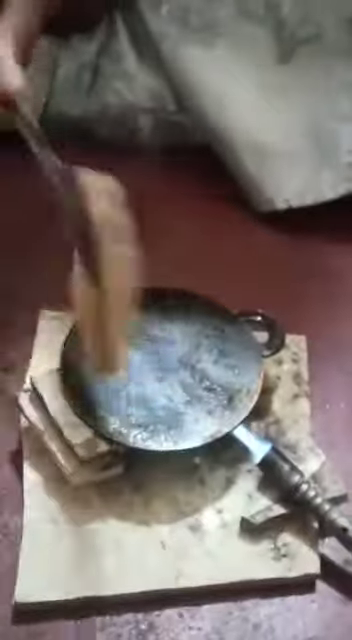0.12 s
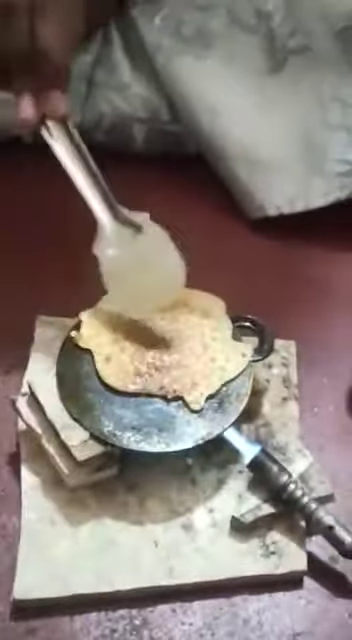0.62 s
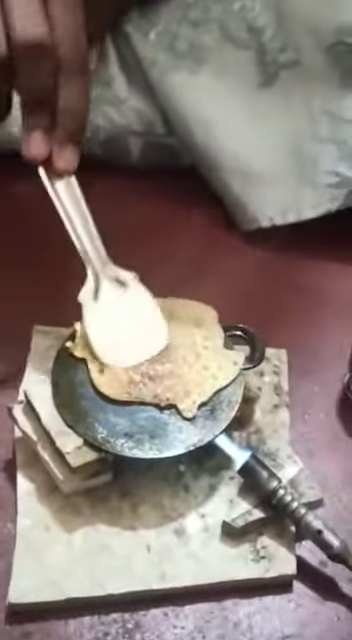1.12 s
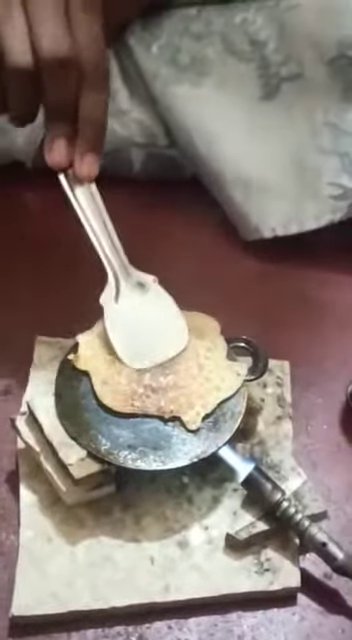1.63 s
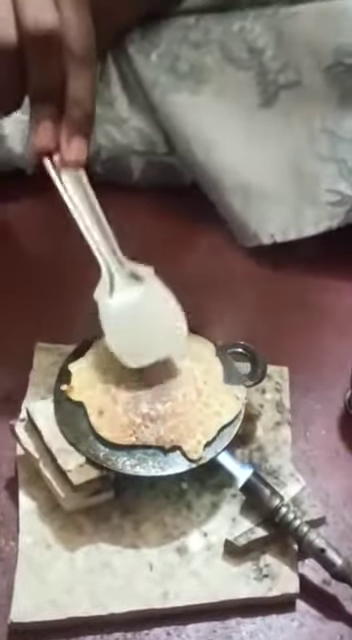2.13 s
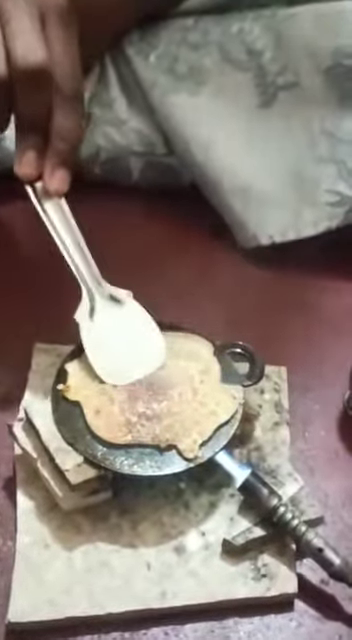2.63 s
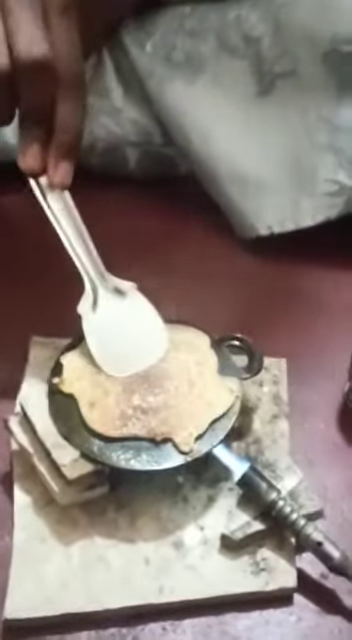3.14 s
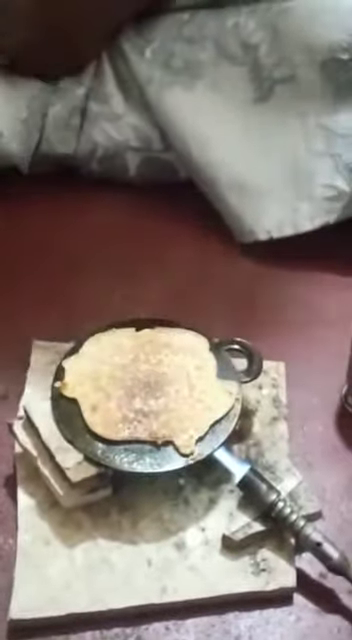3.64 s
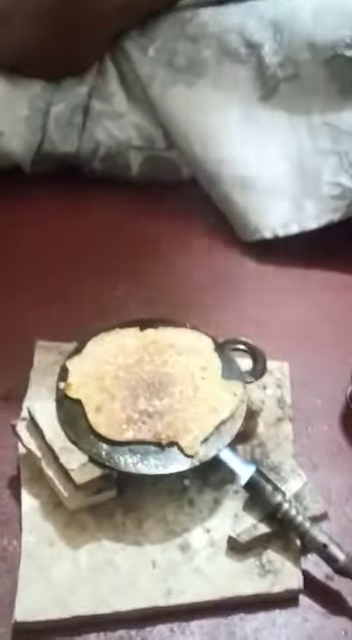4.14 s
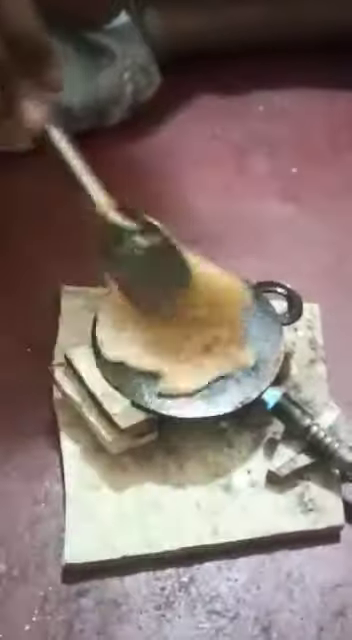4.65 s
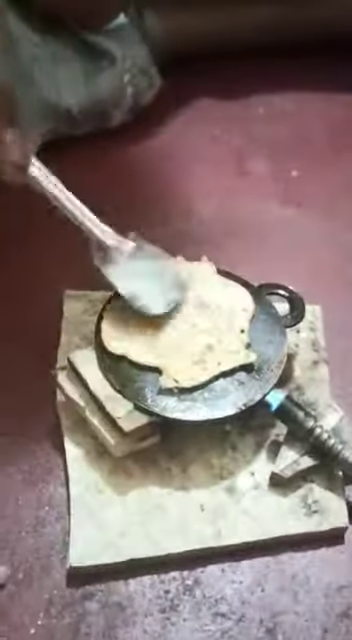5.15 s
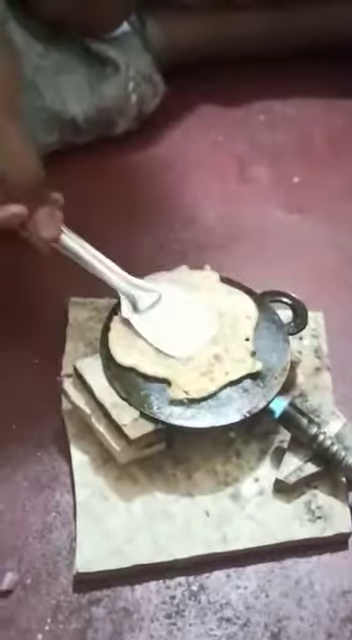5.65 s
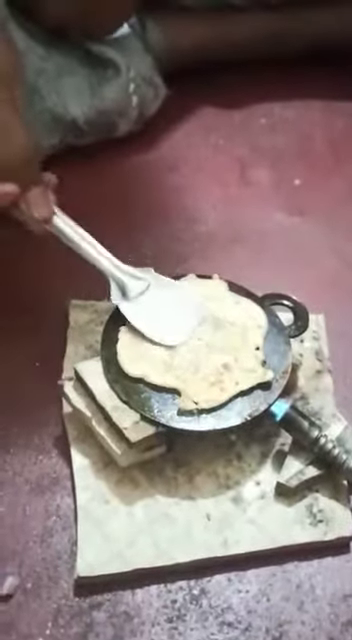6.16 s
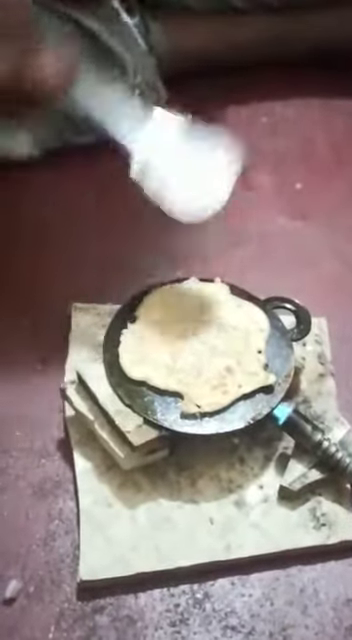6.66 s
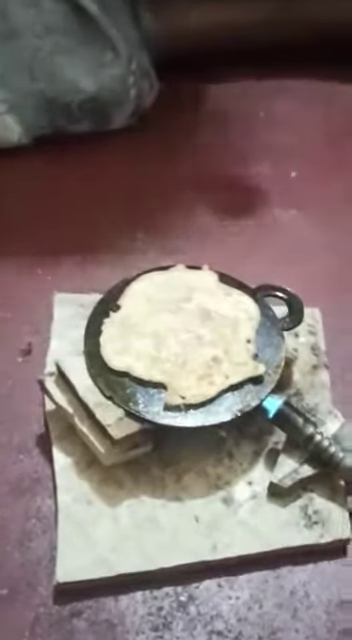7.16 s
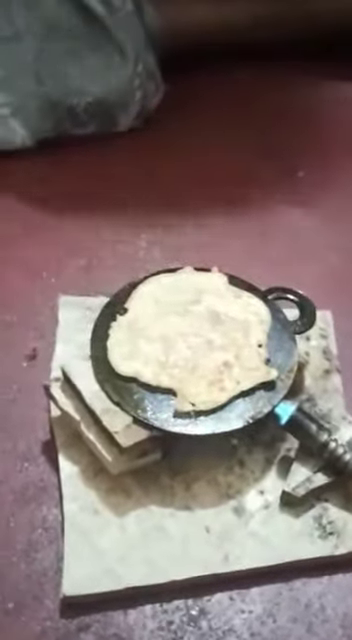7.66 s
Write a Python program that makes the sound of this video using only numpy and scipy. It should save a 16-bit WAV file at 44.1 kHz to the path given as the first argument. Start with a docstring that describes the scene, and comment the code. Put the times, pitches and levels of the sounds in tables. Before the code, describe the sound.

A flatbread slaps onto a hot iron griddle and sizzles loudly over a roaring gas torch, then resumes quieter and drier after a brief dropout.

```python
"""A small hard room: a flatbread lands on a hot iron griddle and sizzles over a roaring gas torch.
Sizzle and steam are shaped noise, swelling mostly under a pressing spatula; fat pops are short cracks
with dying spatter; bread and spatula pat the iron. The torch is roar, drone and nozzle hiss, with mains hum.
The sound drops out once, and resumes on a drier, quieter side of the bread."""
import sys
import numpy as np
from scipy import signal
from scipy.fft import rfft, irfft, next_fast_len
from scipy.io import wavfile
from scipy.ndimage import uniform_filter1d, map_coordinates

SR = 44100
rng = np.random.default_rng(int(sys.argv[2]) if len(sys.argv) > 2 else 0)


def invert_db(x):
    """Field ratio 10**(x/20) for x, a level in decibels (scalar or array-like)."""
    u = np.asarray(x, float) / 20
    return 10 ** u


def persist_wave(psi):
    """Save psi, clipped to +-1, as 16-bit WAV."""
    counts = np.round(np.clip(psi, -1, 1) * 32767).astype(np.int16)
    wavfile.write(sys.argv[1], SR, np.atleast_2d(counts).T)


N = 343690

# Broad flame noise. Each row: frequency in Hz, relative level per Hz in dB.
ROAR_HZ_DB = [(15, -63), (25, -42), (70, -17), (90, -10.5), (134, -11), (173, -10.5), (253, -11),
              (332, -11.5), (460, -15.5), (1500, -31), (1950, -75), (3300, -120)]
# Left-right likeness of the flame noise. Each row: frequency in Hz, correlation from -1 to 1.
ROAR_ALIKE = [(60, 0.28), (130, 0.73), (290, 0.45), (640, 0.44), (1410, -0.6), (3100, 0.19), (6820, -0.1),
              (15000, 0.059)]
# Room resonances that the flame excites. Each row: centre in Hz, width in Hz, rms level in dB.
DRONES = [(136.6, 12, -67.5), (169, 20.4, -53.5), (190.1, 22, -57), (228.3, 23, -63), (343, 8.1, -66)]
# Mains hum. Each row: frequency in Hz, middle rms level in dB.
HUM_HZ_DB = [(49, -79.5), (99.7, -62.5)]
# Gas nozzle hiss. Each row: frequency in Hz, relative level per Hz in dB.
JET_HZ_DB = [(700, -25.5), (1500, -30.5), (4350, -22.5), (4520, -9.5), (4650, 0.5), (4820, -14.5),
             (6000, -23.5), (7000, -6), (8000, -25), (16000, -15.5)]
# Room decay. Each row: frequency in Hz, T60 in seconds.
ROOM_HZ_T60_S = [(300, 0.54), (3000, 0.42), (14000, 0.26)]
# Griddle modes under the bread. Each row: centre in Hz, width in Hz, gain in dB.
IRON_MODES = [(398, 46, 5), (950, 220, 0.5), (1457, 120, 5), (2210, 600, -1)]
# Soft contacts of bread and spatula on the iron. Each row: start in seconds, strength in dB,
# contact time in seconds.
PATS = [(0.191, -22, 0.0014), (2.75, -37, 0.00028), (4.724, -47.5, 0.0002), (6.451, -45, 0.00016)]
# The loudest bursting drops. Each row: start in seconds, strength in dB, brightness in dB.
POPS = [(0.1925, -12, -6), (0.261, -30, 11), (0.3019, -16, -4), (0.4119, -20.5, -0.5), (0.5549, -23, 4.0),
        (0.649, -24, 5), (0.743, -24.5, -4.5), (0.8335, -17, -9), (0.9108, -21, -6), (0.9277, -27.5, 2),
        (1.0037, -21, 7), (1.0226, -12, -7), (1.222, -21, -4), (1.4298, -27, 1), (1.4642, -33, 7),
        (1.4727, -37, 5), (1.5141, -28, 0), (1.6406, -26.0, 3.5), (1.7069, -21, 0), (1.795, -20.0, 2),
        (1.8577, -43, 16), (2.031, -38, -2.0), (2.049, -26, -1), (2.069, -41, 8), (2.2238, -21.5, -4),
        (2.494, -24, -1), (2.549, -16.5, -6), (2.7426, -31, -1), (2.784, -32.5, 5), (2.8421, -25.5, 0.5),
        (3.1034, -26, 3.5), (3.421, -44, 6.0), (3.476, -30, 4.5), (3.494, -24, -6), (3.532, -35.0, 8.5),
        (3.5848, -32.5, 0), (3.6282, -32.5, 4), (3.695, -28, -1), (3.7105, -21.5, -7), (3.9346, -36.5, 6),
        (4.3946, -42, -2), (4.605, -35, -11), (4.7256, -29.5, -11), (4.7763, -34, -8.5), (4.9384, -41, 1),
        (4.9437, -38, 1.5), (5.1944, -47, -7), (5.2392, -38.5, 0.5), (5.3452, -46.5, 6), (5.362, -44.5, 3),
        (5.469, -39, -15.0), (5.5003, -42, 7), (5.5254, -49.5, 12), (5.5844, -31, 3), (5.6005, -42, -7.0),
        (5.6034, -30, -2), (5.8735, -36, -2), (5.8778, -38, -1.0), (5.921, -35, -5.0), (5.935, -33.5, 10),
        (5.946, -33, 2), (5.9668, -31, 8), (5.9816, -47, 9), (5.9967, -38, 13), (6.003, -45, 19),
        (6.0288, -35.5, 11), (6.0369, -52, 6.0), (6.068, -39, 8.0), (6.0882, -27, -8.0), (6.1137, -36, 4.5),
        (6.1583, -36.0, 8), (6.1698, -32, 3), (6.186, -44, 11), (6.208, -36, 6), (6.2328, -29.5, 7),
        (6.2444, -49, 8.0), (6.2538, -36.0, 1), (6.261, -34.0, 9.5), (6.307, -39, 0.0), (6.3279, -35, 8),
        (6.3447, -40.5, 10), (6.389, -35, 2), (6.4348, -33, 7.5), (6.454, -26, 1), (6.5715, -27.5, 6),
        (6.578, -34, 8), (6.583, -32.5, 5.0), (6.603, -33, 5.0), (6.6716, -28, 0.5), (6.7467, -36.5, 5),
        (6.794, -42.0, 6), (6.8219, -21.5, 2.5), (6.84, -40, 6), (6.9384, -35.0, -1), (7.059, -36.5, 2),
        (7.1148, -31.5, -2), (7.1752, -38, 0), (7.286, -46, 7), (7.3752, -42, 11), (7.6544, -38, 10),
        (7.6618, -24, -3.5), (7.7723, -29, -17)]
# Crackle gain below and above 10 kHz, in dB.
CRACKLE_DB = [9.5, 14.5]
# Frying hiss. Each row: frequency in Hz, relative level per Hz in dB.
FIZZ_HZ_DB = [(200, -76.5), (900, -22.5), (1900, -20.5), (3200, -7.5), (4300, -3.5), (4680, -2.5),
              (4800, -10.5), (6050, -7.5), (6300, 0), (6800, -1.5), (7550, -3.5), (7700, -6), (12800, -7.5),
              (13100, -5), (16000, -5)]
# Steam hiss. Each row: frequency in Hz, relative level per Hz in dB.
STEAM_HZ_DB = [(210, -47), (350, -19.5), (417, -4.5), (546, -10.5), (700, -4.5), (850, -0.5), (1170, -12.5),
               (1480, -1.5), (1890, -7.5), (2600, -6), (3380, -12), (5720, -120)]
# Left-right likeness of the frying. Each row: frequency in Hz, correlation from -1 to 1.
FRY_ALIKE = [(400, 0.39), (800, 1), (1200, 0.17), (2000, 0.033), (15000, 0.033)]
# Sides of the bread. Each row: laid down in seconds, relative sizzle level in dB, its drift in dB/s,
# relative steam level in dB, its drift in dB/s.
SIDES = [(0.165, -34.5, -4, -50.5, -2.5), (4.275, -65.5, 3, -72.5, 1.5)]
# Character of each side. Each row: base brightness in dB, base spits over hiss in dB,
# nozzle hiss in dB, griddle left minus right in dB.
CHARACTER = [(-0.5, -19.5, -46, 0.54), (-3, -3.5, -63.5, 1)]
# Frying swells, mostly under the pressing spatula, and lulls. Each row: middle in seconds,
# half length to 1/e in seconds, sizzle gain in dB, steam gain in dB, brightness gain in dB.
PRESSES = [(0.281, .08, 2.5, 0, -1), (0.452, .12, 3.5, 4.3, 0.17), (0.81, .12, 1.5, 3, 0.6),
           (1.119, .13, 3, 4.5, -0.47), (1.681, 0.1, 4, 6.5, 0.6), (1.861, 0.09, 4, 6.5, 0.86),
           (2.204, 0.14, -2.5, -0.5, -0.5), (2.512, 0.14, 6, 7.5, -3), (3.197, 0.22, 6, 8, -1.26),
           (3.53, 0.085, 2, 0.5, 0.86), (4.16, 0.16, 8, 4, 3.5), (4.781, 0.15, 5, 5, -2),
           (5.61, 0.16, 3, 9, 3), (6.094, 0.34, 4.5, 6.5, 9.5), (6.899, 0.35, 2.5, 2, 2),
           (7.349, 0.2, -0.5, 0, 0.54)]
# Microphone colour. Each row: frequency in Hz, gain in dB.
MICROPHONE_HZ_DB = [(8450, 0), (8600, -10), (9000, -15), (10800, -13), (11000, -80.5), (11350, -87),
                    (11650, 1.5), (15480, -1.5), (15600, -39), (15900, -58), (17000, -76)]
# Balance of the two ports. Each row: frequency in Hz, left minus right in dB.
PORTS_HZ_DB = [(100, 1), (300, -3), (700, 0.5), (1200, -4), (2500, 2), (5000, -1.5), (8200, 0), (12000, 1),
               (15000, -10)]
# Dropout: start in seconds, end in seconds.
DROPOUT_S = (4.1345, 4.251)

HALVES = np.array([[0.5], [-0.5]])  # splits a left-minus-right value over the ports
SPIKY = 0.64  # dB of spit and small-drop strength per dB of brightness
SPLIT_HZ = 10000  # treble above this varies with brightness


def unit(x):
    """Scale to rms 1."""
    return x / np.sqrt(np.mean(x ** 2) + 1e-20)


def along(points, hz):
    """Interpolate (Hz, value) points on a log axis."""
    f, v = np.transpose(points)
    return np.interp(np.log(hz + 1), np.log(f + 1), v)


def wobble(knots_per_s):
    """A smooth random curve."""
    knots = rng.standard_normal(int(N * knots_per_s / SR) + 4)
    return map_coordinates(knots, [np.arange(N) * knots_per_s / SR])


def filtered(x, response):
    """Apply a complex response of frequency."""
    m = next_fast_len(N + SR // 2)
    return irfft(rfft(x, m) * response(np.fft.rfftfreq(m, 1 / SR)), m)[..., :N]


def rush(spectrum, alike, patchy_db):
    """Turbulence: stereo noise of rms 1 with time-frequency patches of random gain."""
    z = signal.stft(rng.standard_normal((2, N)), nperseg=512)[2]
    field = uniform_filter1d(rng.standard_normal(z.shape[1:]), size=6, axis=0)
    field = uniform_filter1d(field, size=10, axis=1)
    pair = signal.istft(z * invert_db(patchy_db * unit(field)), nperseg=512)[1][:, :N]

    def mid_side_gains(hz):
        turn = np.arccos(np.clip(along(alike, hz), -1, 1)) / 2
        return invert_db(along(spectrum, hz)) * [np.cos(turn), np.sin(turn)]

    mid, side = filtered(pair, mid_side_gains)
    return unit(np.array([mid + side, mid - side]))


def flame_roar():
    """Broad turbulent noise with a slowly wandering level."""
    level_db = -53.5 + 0.46 * wobble(3.28)
    return invert_db(level_db) * rush(ROAR_HZ_DB, ROAR_ALIKE, patchy_db=1.0)


def drone():
    """Room resonances as narrow bands of noise."""
    total = np.zeros(N)
    for centre_hz, width_hz, db in DRONES:
        band = filtered(rng.standard_normal(N), lambda f: 1 / (1 + ((f - centre_hz) / width_hz) ** 2 * 4))
        total += invert_db(db) * unit(band)
    return total


def mains_hum():
    """Mains tones with wandering level and phase."""
    total = np.zeros(N)
    for hz, db in HUM_HZ_DB:
        level = np.sqrt(2) * invert_db(db + 2.6 * wobble(3.5))
        total += level * np.sin(2 * np.pi * hz * np.arange(N) / SR + 0.5 * wobble(4.6))
    return total


def nozzle_hiss():
    """Gas jet turbulence; its level differs between the two sides."""
    jet_db = frying()[4]
    return invert_db(jet_db) * rush(JET_HZ_DB, [(1000, 0.068)], patchy_db=1.7)


def room(x):
    """A short noise tail per port; each frequency dies at its own speed."""
    hz, t, z = signal.stft(rng.standard_normal((2, SR // 4)), SR, nperseg=128)
    decay = invert_db(-60 * t / along(ROOM_HZ_T60_S, hz)[:, None])
    tail = signal.istft(z * decay, SR, nperseg=128)[1]
    delayed = np.pad(x, ((0, 0), (80, 0)))
    return signal.fftconvolve(delayed, tail / np.linalg.norm(tail[0]), axes=1)[:, :N]


def iron(blows):
    """The damped griddle answers in a few broad modes and radiates no deep bass."""
    def response(f):
        modes = 0
        for k, (centre_hz, width_hz, db) in enumerate(IRON_MODES):
            damping = 1j * f * width_hz
            modes = modes + (-1) ** k * invert_db(db) * damping / (centre_hz ** 2 - f ** 2 + damping)
        return 1j * f / (150 + 1j * f) * modes

    return filtered(blows, response)


def pats():
    """Soft contacts: a half-sine push, duller the longer it lasts, and a noisy rustle."""
    t, blows = np.arange(SR // 10) / SR, np.zeros(N + SR)
    for start_s, db, contact_s in PATS:
        push = np.sin(np.pi * np.minimum(t / contact_s, 1)) * 0.00037 / contact_s
        rustle = 0.39 * invert_db(-60 * t / 0.019) * rng.standard_normal(len(t))
        blows[round(start_s * SR):][:len(t)] += invert_db(db) * (5 * push + rustle)
    return iron(blows[:N])


def small_pops():
    """Random lesser drops follow the sizzle level and crowd where it is bright."""
    count, crowd_db_per_db = 260, 2
    over_sizzle_db, spread_db, bright_db, spatter_db = 3, 2.8, -6, -26
    sizzle_db, _, treble_db, *_ = frying()
    when, size = rng.uniform(size=(count, 2)).T
    passed = np.cumsum(invert_db(crowd_db_per_db * treble_db))
    at = np.minimum(np.searchsorted(passed, when * passed[-1]), N - 1)
    scatter_db = -spread_db * np.log(size + 0.038)
    db = sizzle_db[at] + SPIKY * treble_db[at] + over_sizzle_db + scatter_db
    return [(s, level, bright_db, spatter_db) for s, level in zip(at / SR, db)]


def pops():
    """Each drop snaps, is echoed by the floor, throws a dying clumpy spatter and thuds on the iron."""
    crack_t60_s, crack_rise_s = 0.0022, 0.0002
    echo_s, echo_db = 0.0016, [-18, -2]  # echo: left, right
    spatter_t60_s, spatter_rise_s, large_spatter_db = 0.06, 0.0014, -21
    pan_spread_db = 1.5
    t = np.arange(SR // 6) / SR
    crackle, thuds = np.zeros((2, 2, N + SR)), np.zeros(N + SR)  # crackle: band, port, time
    drops = [(*pop, large_spatter_db) for pop in POPS] + small_pops()
    for start_s, db, bright_db, spatter_db in drops:
        at = round(start_s * SR)
        chance = rng.standard_normal((4, len(t)))
        crack_shape = invert_db(-60 * t / crack_t60_s) * (1 - np.exp(-t / crack_rise_s))
        crack = crack_shape * (chance[0] + 0.3 * chance[1:3])
        crack *= 1.6 / np.linalg.norm(crack[0])
        crack[:, 12] += 3.4  # the skin of the drop snaps
        echo_gain = invert_db(echo_db)[:, None] * invert_db(1.9 * chance[3, -3:-1, None])
        crack = crack + echo_gain * np.roll(crack, round(echo_s * SR), axis=1)
        clumps_db = 5 * unit(uniform_filter1d(chance[3], size=30))
        spatter_shape = invert_db(spatter_db - 60 * t / spatter_t60_s + clumps_db)
        spatter = spatter_shape * (1 - np.exp(-t / spatter_rise_s)) * chance[1:3]
        pan_db = pan_spread_db * chance[3, -1] * HALVES
        drop = invert_db(db + pan_db) * (crack + spatter)
        crackle[:, :, at:at + len(t)] += [drop, invert_db(bright_db) * drop]
        thuds[at:at + len(t)] += invert_db(db - 6.0 - 60 * t / 0.011) * chance[0]

    def band_response(hz):
        bands = np.array([hz <= SPLIT_HZ, hz > SPLIT_HZ])[:, None]
        return bands * invert_db(along(FIZZ_HZ_DB, hz)) * invert_db(CRACKLE_DB)[:, None, None]

    crackle = filtered(crackle[..., :N], band_response)
    return crackle.sum(axis=0) + iron(thuds[:N])


def frying():
    """Sizzle, steam and brightness drift from each side's start plus swells; then spits, jet, balance."""
    catch_s = 0.01  # time scale for the wet face to meet the iron
    t = np.arange(N) / SR
    side = (t >= SIDES[1][0]).astype(int)
    laid_s, sizzle_db, sizzle_drift, steam_db, steam_drift = np.transpose(SIDES)[:, side]
    before = np.minimum((SIDES[0][0] - t) / catch_s * 2, 50)
    catch_db = 20 * np.log10(1e-4 + 1 / (1 + np.exp(before)))
    age_s = t - laid_s
    swells_db = sum(np.outer(gains_db, np.exp(-((t - middle_s) / abs(half_s)) ** 2))
                    for middle_s, half_s, *gains_db in PRESSES)
    treble_db, *others = np.transpose(CHARACTER)[:, side]
    levels_db = np.array([sizzle_db + sizzle_drift * age_s + catch_db,
                          steam_db + steam_drift * age_s + catch_db,
                          treble_db])
    return *(levels_db + swells_db), *others


def brighter(x, treble_db):
    """Lift or dull the treble, moment by moment."""
    top = filtered(x, lambda hz: hz > SPLIT_HZ)
    return x + top * (invert_db(treble_db) - 1)


def bubble_hiss():
    """Thousands of bursting steam bubbles gate a hiss with millisecond swells."""
    count, grain_s = 5000, 0.00089
    when, size = rng.uniform(size=count), rng.exponential(size=count)
    bursts = np.bincount((when * N).astype(int), invert_db(5.3 * np.minimum(size, 5)), N)
    life = np.arange(300) / SR / grain_s
    grain = signal.fftconvolve(bursts, life * np.exp(-life))[:N]
    gate = 1.07 + 0.34 * unit(grain)
    wash = rush(FIZZ_HZ_DB, FRY_ALIKE, patchy_db=0.8)
    return unit(gate * invert_db(0.84 * wobble(32) + 0.4 * wobble(6.3)) * wash)


def spits():
    """Sharp clicks of random size and sign, the same shape in both ports."""
    count = 5000
    when, size = rng.uniform(size=count), rng.exponential(size=count)
    sign = np.sign(rng.standard_normal(count))
    clicks = np.bincount((when * N).astype(int), sign * invert_db(3.3 * np.minimum(size, 4.5)), N)
    return unit(filtered(clicks, lambda hz: invert_db(along(FIZZ_HZ_DB, hz))))


def steam():
    """Steam pressed from the bread: patchy noise that swells with the presses."""
    level_db = frying()[1] + 3 + 0.4 * wobble(12)
    return rush(STEAM_HZ_DB, FRY_ALIKE, patchy_db=1.4) * invert_db(level_db)


def sizzle():
    """Bubble hiss with spits on top, stronger and brighter together."""
    sizzle_db, _, treble_db, spit_db, *_ = frying()
    fry = bubble_hiss() + invert_db(spit_db + SPIKY * treble_db) * spits()
    return brighter(fry * invert_db(sizzle_db + 5.5), treble_db)


def scene():
    """Griddle sounds reach the right port slightly late; hits wake the room; the torch lies beneath."""
    left_lead_s = 5 / SR
    torch = flame_roar() + drone() + mains_hum() + nozzle_hiss()
    hits = pops() + pats()
    griddle = sizzle() + steam() + hits + invert_db(-6.5) * room(hits)
    griddle = filtered(griddle, lambda hz: np.exp(1j * np.pi * hz * left_lead_s * np.array([[1], [-1]])))
    balance_db = frying()[5]
    return griddle * invert_db(balance_db * HALVES) + torch


def dropout():
    """Gain that falls at once, dies away, and returns."""
    step_db, fade_db_per_s = -62, -2500
    start_s, end_s = DROPOUT_S
    t = np.arange(N) / SR
    remnant_db = np.minimum(step_db + fade_db_per_s * (t - start_s), 0)
    return np.where((t > start_s) & (t < end_s), invert_db(remnant_db), 1)


def top_cut(x):
    """Nothing passes above the cut-off."""
    return signal.sosfilt(signal.butter(12, 16810, fs=SR, output="sos"), x)


def record(dry):
    """Microphone and port colour with a deep treble dip, then one dropout."""
    def colour(hz):
        return invert_db(along(MICROPHONE_HZ_DB, hz) + along(PORTS_HZ_DB, hz) * HALVES)

    heard = filtered(dry, colour) * dropout()
    return top_cut(heard)


dry = scene()
out = record(dry)
persist_wave(out)
```